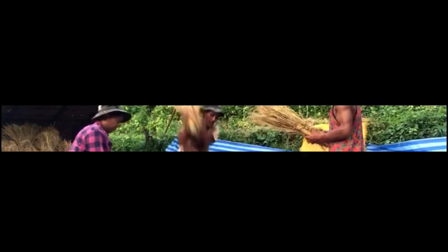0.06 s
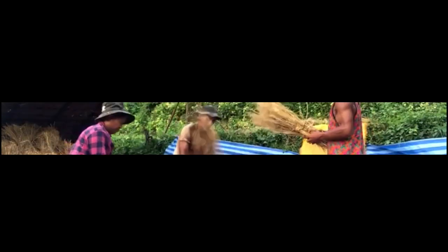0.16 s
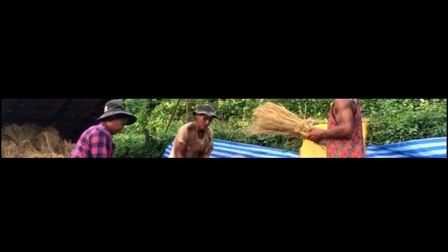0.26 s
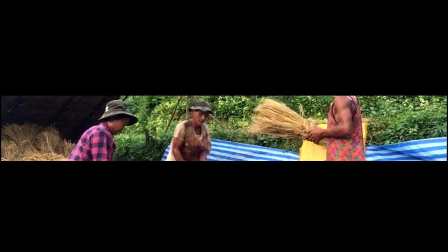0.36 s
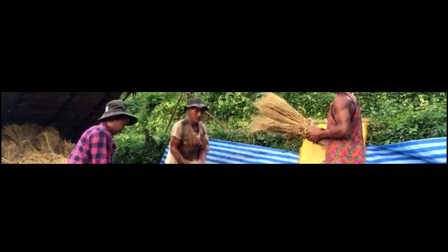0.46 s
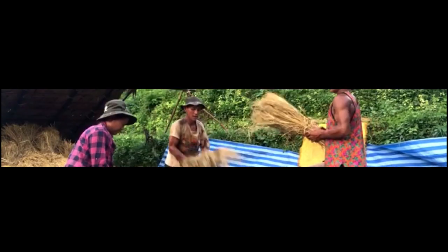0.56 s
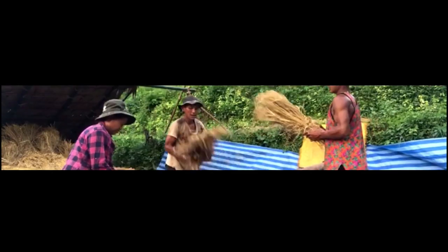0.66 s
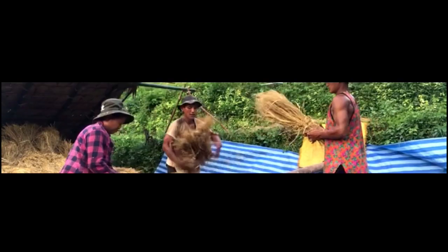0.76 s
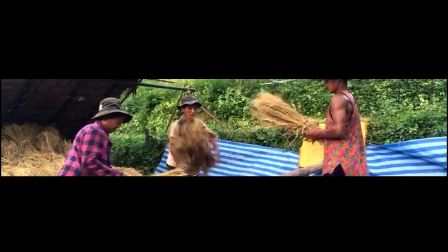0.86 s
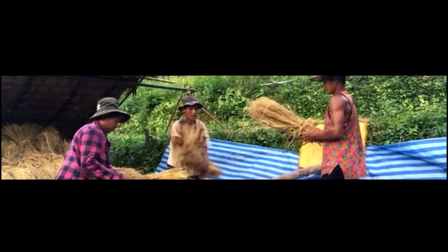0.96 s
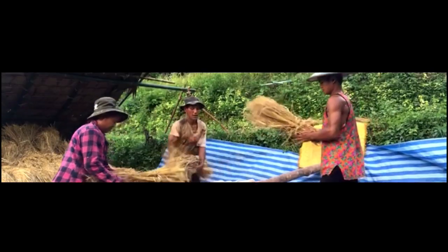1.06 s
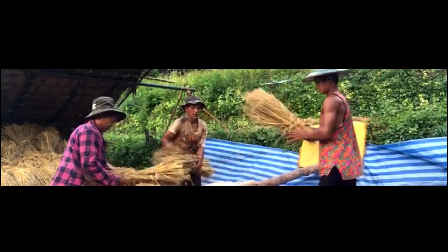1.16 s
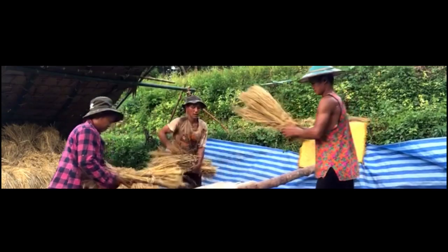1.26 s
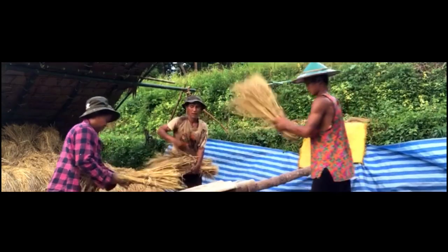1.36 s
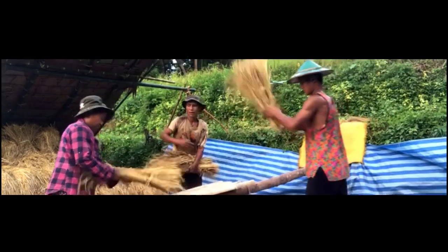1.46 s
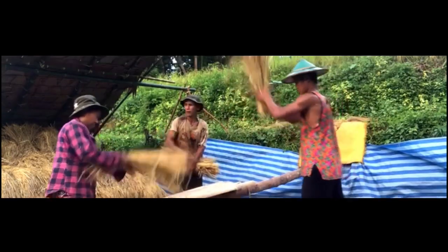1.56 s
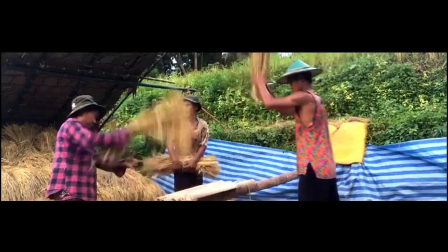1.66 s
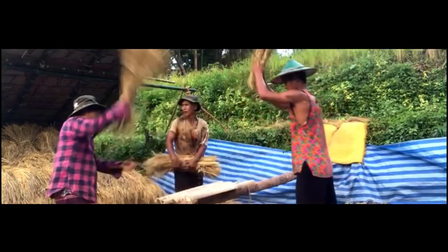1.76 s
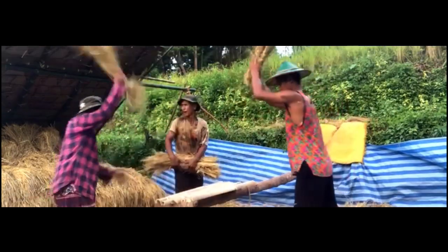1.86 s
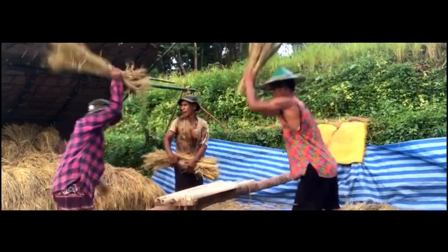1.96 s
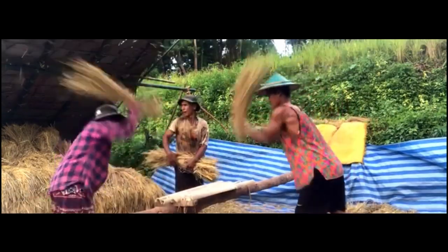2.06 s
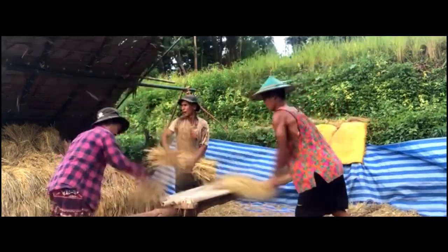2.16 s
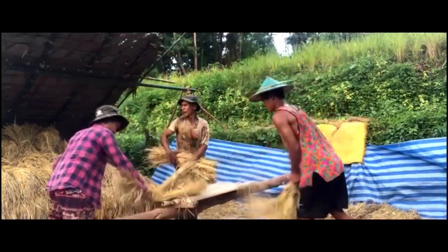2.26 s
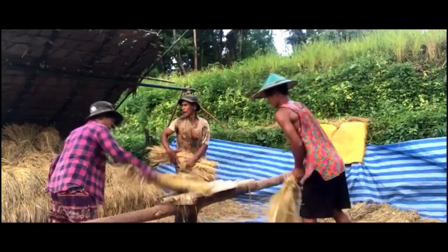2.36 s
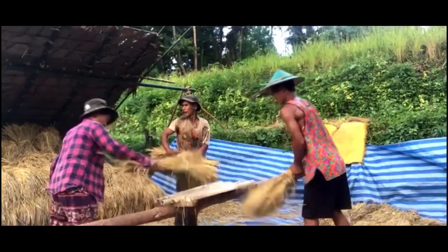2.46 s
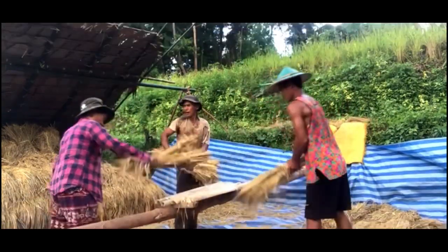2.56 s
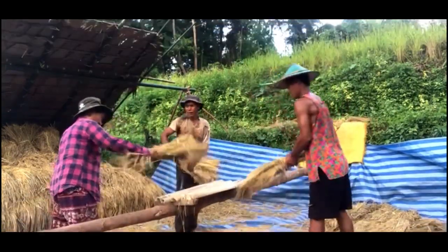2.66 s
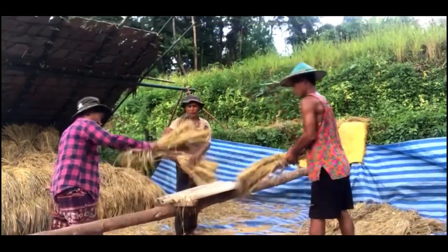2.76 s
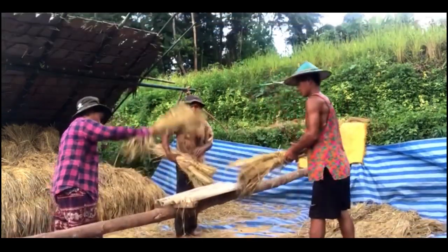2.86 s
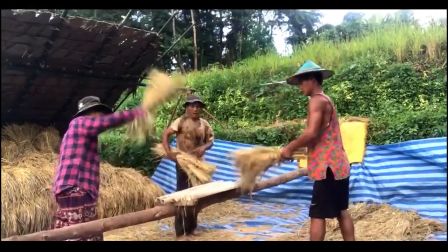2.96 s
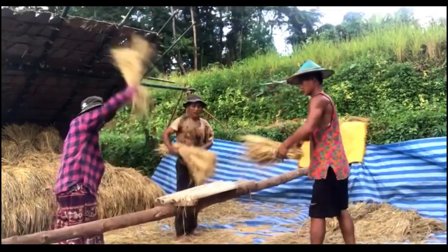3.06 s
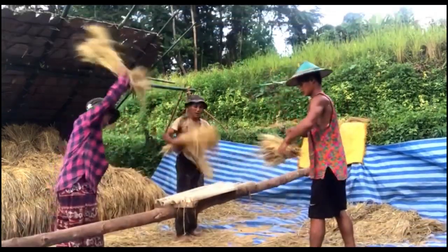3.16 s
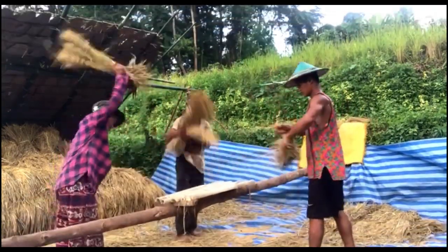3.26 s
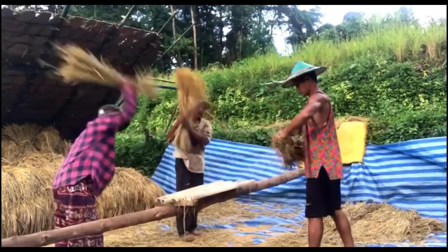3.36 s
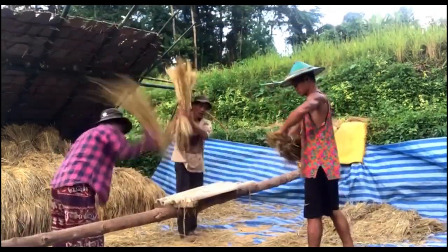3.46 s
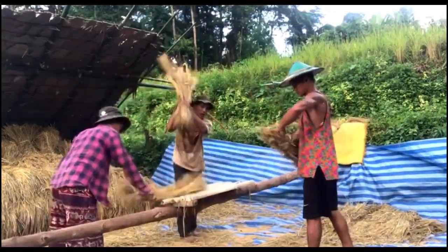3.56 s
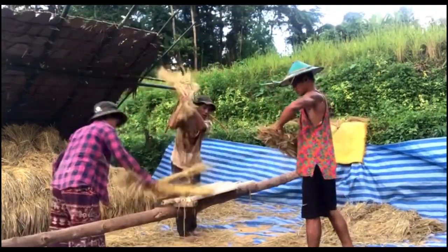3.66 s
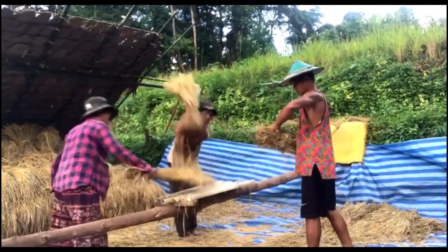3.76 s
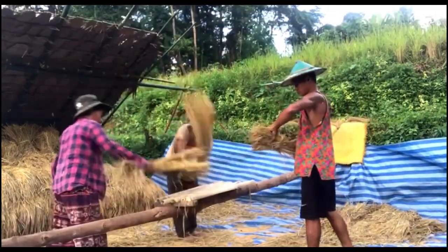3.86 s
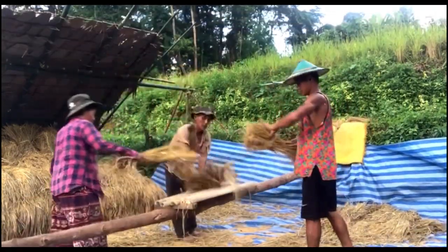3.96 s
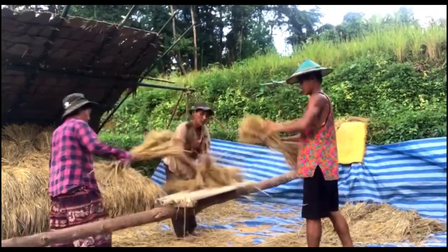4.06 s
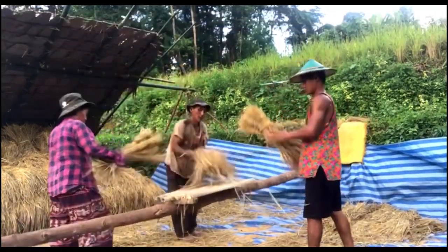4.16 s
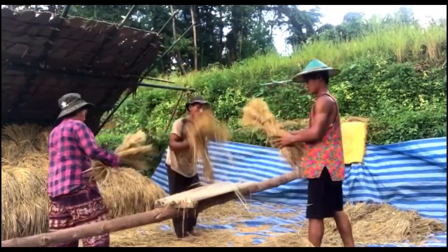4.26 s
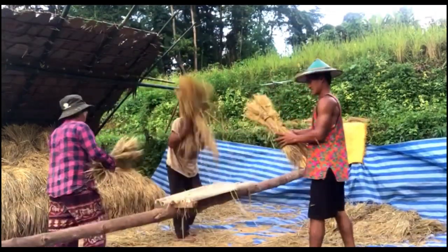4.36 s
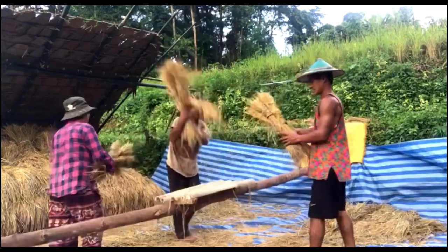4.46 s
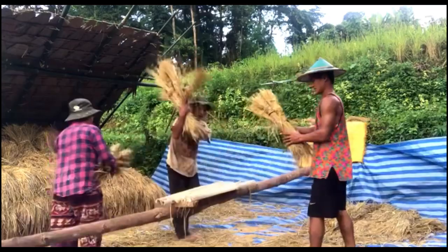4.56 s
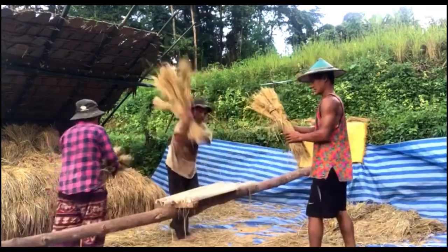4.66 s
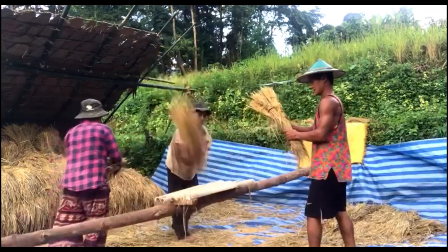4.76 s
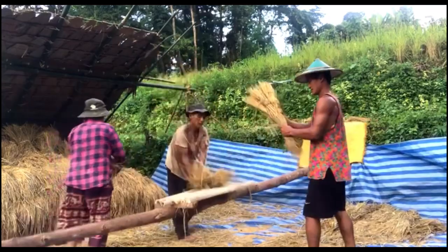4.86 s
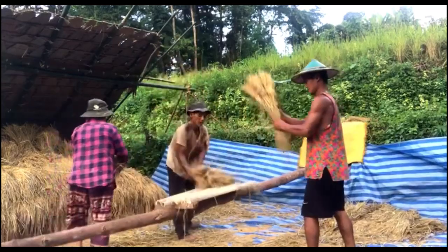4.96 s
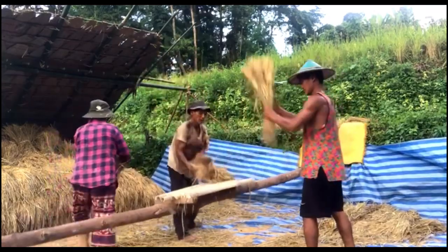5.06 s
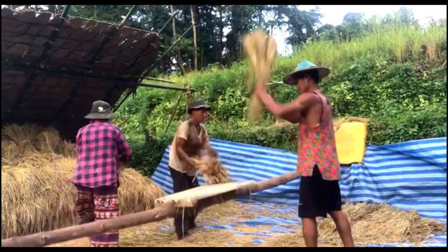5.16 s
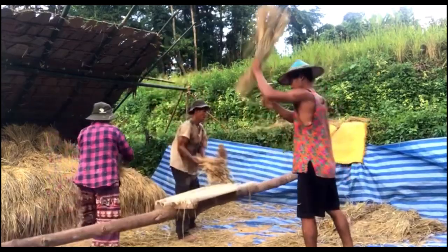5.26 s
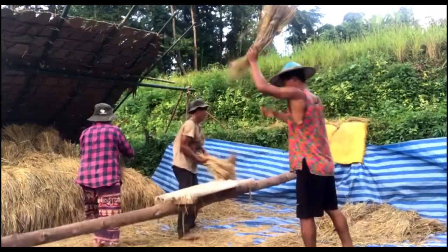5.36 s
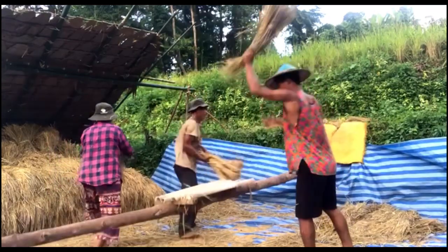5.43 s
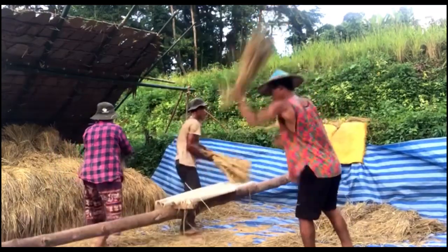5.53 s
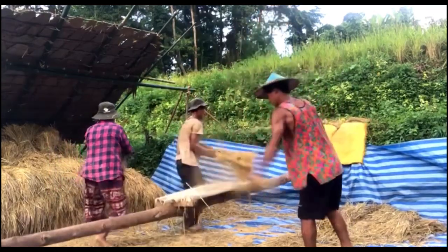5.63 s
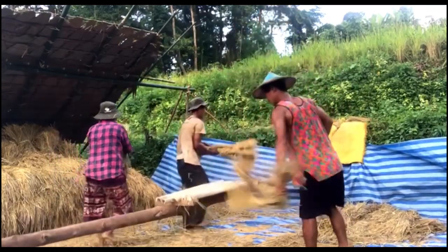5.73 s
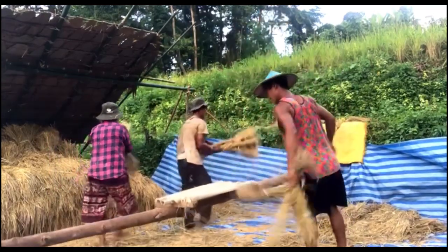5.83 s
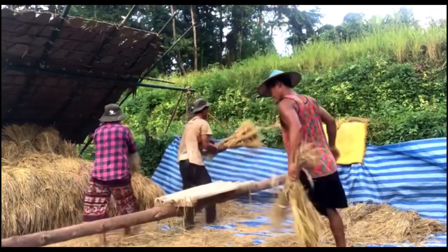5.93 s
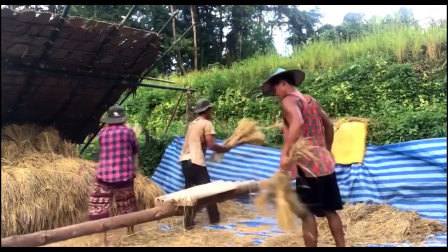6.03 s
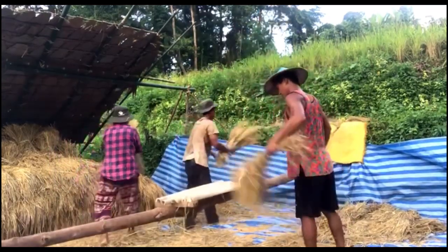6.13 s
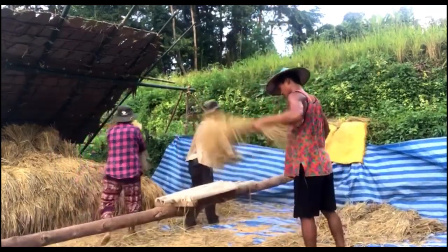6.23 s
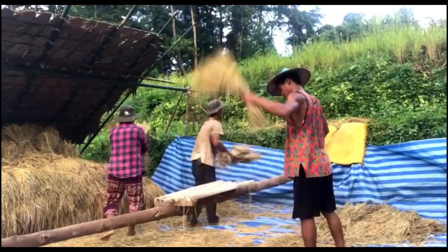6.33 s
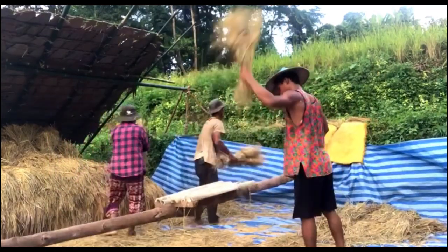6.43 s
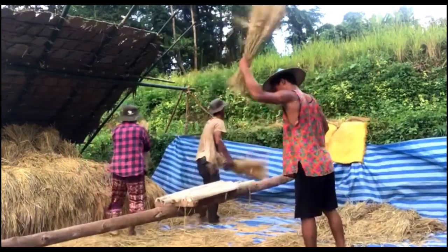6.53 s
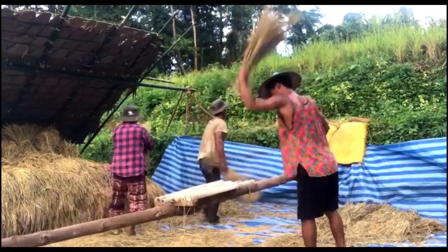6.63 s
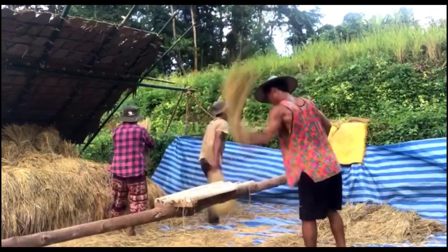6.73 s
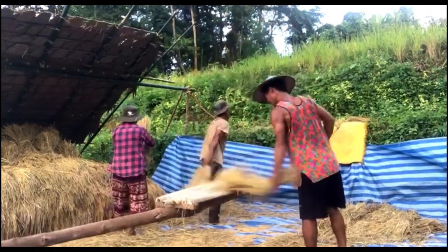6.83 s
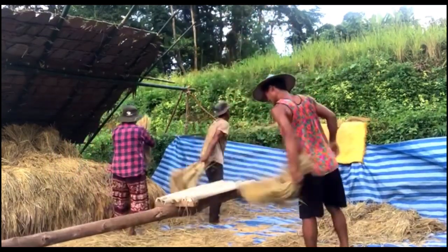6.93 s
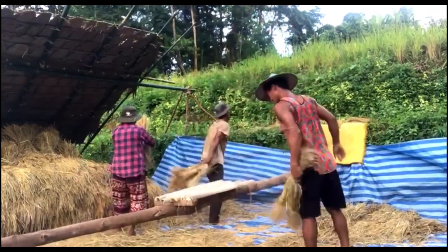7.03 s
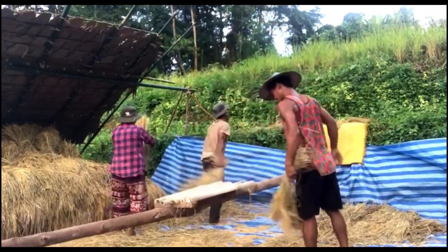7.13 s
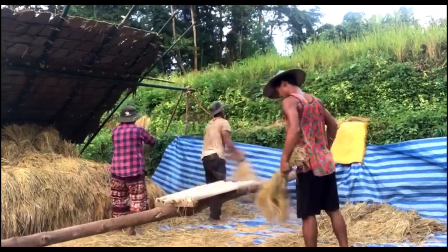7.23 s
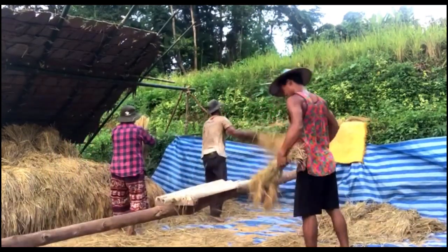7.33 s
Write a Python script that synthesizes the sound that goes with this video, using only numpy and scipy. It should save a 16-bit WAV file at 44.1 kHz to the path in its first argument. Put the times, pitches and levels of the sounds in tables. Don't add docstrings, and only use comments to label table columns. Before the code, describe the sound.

One woody blow comes at once, then straw is shaken and rustled for nearly two seconds before two quick smacks land almost together. More single blows follow irregularly, each with a swish before it, gritty grain spray and stalks dragging away. Dry stalks click and crackle between hits. Quiet open field air, barely audible high insects and a faint bird, picked up by a small mono microphone a few metres off.

```python
import sys
import numpy as np
from scipy import signal
from scipy.fft import rfft, irfft
from scipy.io import wavfile
from scipy.ndimage import uniform_filter1d

SR = 44100
rng = np.random.default_rng(int(sys.argv[2]) if len(sys.argv) > 2 else 0)


def digitize_waveform(pressure):
    field = np.atleast_2d(pressure).T
    bounded = np.clip(field, -1, 1)
    quanta = np.round(bounded * 32767).astype(np.int16)
    wavfile.write(sys.argv[1], SR, quanta)


def ratio_of_db(decibels):
    return 10 ** (np.asarray(decibels, float) / 20)


N = 325878

# time in seconds, peak level in dB, plank boom in Hz,
# boom level in dB and knock level in dB, both relative to the peak.
BLOW_EVENTS = [(0.2506, -7, 207, -9.5, -7), (2.2022, -1, 340, -32, -14.5), (2.2609, -5, 235, -10, -3.5),
               (3.6156, -2.5, 324, -16, -5.5), (3.9915, -3, 376, -13, -5.5), (4.8971, -3.5, 280, -19, -22),
               (5.7166, -4, 194, -10, -3.5), (6.8806, -3, 287, -16.5, -10)]


def unit(x):
    return x / np.sqrt(np.mean(x ** 2))


def top(x):
    return x / np.max(np.abs(x))


def colour(x, outline):
    hz, db = np.transpose(outline)
    bins_hz = np.maximum(np.arange(1025) * SR / 2048, 1)
    ceps = irfft(np.interp(np.log(bins_hz), np.log(hz), db) * np.log(10) / 20)
    ceps[1:1024] *= 2
    ceps[1025:] = 0
    response = irfft(np.exp(rfft(ceps)))
    return signal.fftconvolve(x, response)[:len(x)]


def band(x, lo_hz, hi_hz, order=2):
    edges_hz = [lo_hz, min(hi_hz, .45 * SR)]
    return signal.sosfilt(signal.butter(order, edges_hz, "band", fs=SR, output="sos"), x)


def split(x, hz):
    low = signal.sosfiltfilt(signal.butter(2, hz, fs=SR, output="sos"), x)
    return low, x - low


def ring(x, hz, t60):
    pole = np.exp(2j * np.pi * hz / SR - np.log(1000) / (t60 * SR))
    return signal.lfilter([1], [1, -pole], x).imag


def grains(size, spread_db):
    strength_db = spread_db * rng.exponential(size=size).clip(0, 4)
    return unit(rng.standard_normal(size) * ratio_of_db(strength_db))


def walk(rate):
    k = int(SR / rate)
    return unit(uniform_filter1d(uniform_filter1d(rng.standard_normal(N), k), k))


def add(out, s, x):
    i = int(s * SR)
    out[i:i + len(x)] += x[:len(out) - i]


def field():
    # frequency in Hz, level in dB per Hz.
    air_outline = [(15, -84), (35, -6), (60, 7.5), (140, -13.5), (400, -11), (1200, -6.5), (4500, 0.5),
                   (8000, -3), (12500, -10)]
    # frequency in Hz, half width in Hz, level in dB.
    insects = [(7740, 120, -1), (8050, 70, -6)]
    # start in seconds, length in seconds, level in dB.
    trills = [(0.92, 0.06, -57), (1.93, 0.12, -62), (2.84, 0.13, -60), (3.08, 0.43, -62), (4.37, 0.07, -62),
              (4.64, 0.06, -59), (5.2, 0.07, -64), (5.37, 0.22, -64), (6.71, 0.09, -61), (7.27, 0.11, -65)]
    # start in seconds, length in seconds, pitch in Hz, level in dB.
    bird_notes = [
        (2.642, 0.061, 3430, -62),
        (2.76, 0.33, 3130, -66),
        (2.83, 0.018, 1690, -59),
        (2.938, 0.071, 1660, -59),
        (3.153, 0.034, 1475, -65),
    ]
    t = np.arange(N) / SR
    out = unit(colour(rng.standard_normal(N), air_outline)) * ratio_of_db(-58)

    effort = ratio_of_db(-66.5)
    for s, length, db in trills:
        patch = np.exp(-((t - s - length / 2) / (.55 * length)) ** 4)
        effort = effort + ratio_of_db(db - 11) * patch
    flutter = 1 + .5 * np.sin(2 * np.pi * 150 * t)
    for hz, width_hz, db in insects:
        voice = unit(band(rng.standard_normal(N), hz - width_hz, hz + width_hz))
        out = out + voice * effort * flutter * ratio_of_db(db + 3.5 * walk(40))

    waver = ratio_of_db(3 * walk(90) - 2)
    drift = .012 * walk(60)
    for s, length, hz, db in bird_notes:
        u = t[:int(length * SR)]
        here = slice(int(s * SR), int(s * SR) + len(u))
        breath = np.sin(np.pi * np.sqrt(u / length)).clip(0)
        whistle = np.sin(2 * np.pi * hz * (u + np.cumsum(drift[here]) / SR))
        add(out, s, ratio_of_db(db + 8.5) * breath * whistle * waver[here])
    return out


def swell(s, db, rise, fall, shape=1.44):
    late = np.arange(N) / SR - s
    return ratio_of_db(db) * np.exp(-(1.55 * np.abs(late) / np.where(late < 0, rise, fall)) ** shape)


def motion():
    # time in seconds, leaf hiss in dB, swell in seconds,
    # fade in seconds, crunch in dB relative to the hiss.
    handling = [(.1, -49.5, 0.028, 0.35, -15), (.56, -49.5, 0.19, .1, -13), (.72, -46, 0.12, 0.11, -38),
                (.8, -51, 0.072, 0.26, -8.5), (1.01, -42, 0.037, 0.038, -20.5), (1.2, -50, 0.3, 0.12, -25),
                (1.57, -46.5, 0.12, 0.29, -19), (2.51, -46, 0.16, 0.24, -14), (2.85, -53, 0.28, 0.22, -15),
                (3.1, -56, 0.13, 0.051, -19), (3.71, -53.5, 0.049, 0.099, -10),
                (3.85, -44.5, 0.11, 0.098, -23), (4.16, -51, 0.055, 0.14, -11),
                (4.28, -49, 0.081, 0.12, -8), (4.47, -52.5, 0.078, 0.28, -2.5),
                (5.17, -55.5, 0.3, 0.21, -7.5), (6.17, -54.5, .1, .04, -3.5),
                (5.92, -46.5, 0.12, 0.2, -16.5), (6.04, -47.5, 0.17, 0.34, -14),
                (1.35, -50.5, 0.11, 0.14, -16), (6.3, -43.5, 0.052, 0.078, -19),
                (6.47, -53.5, 0.21, 0.22, -14), (6.67, -63, 0.073, 0.028, 4),
                (7.098, -43.5, 0.095, 0.17, -13.5)]
    # swing level in dB,
    # swing rise in seconds, drag level in dB.
    swings = [(-51.5, 0.19, -48), (-43, 0.061, -49), (-42, 0.048, -48.5), (-42, 0.063, -48.5),
              (-41, 0.047, -46.5), (-49.5, 0.14, -50.5), (-38.5, 0.061, -45), (-42.5, 0.054, -45.5)]
    leaves, crunch, feet, drags = ratio_of_db(-56.5), ratio_of_db(-64), ratio_of_db(-64.5), 0
    for s, db, rise, fall, crunch_db in handling:
        move = swell(s, db, rise, fall)
        leaves = leaves + move
        crunch = crunch + ratio_of_db(crunch_db) * move
        feet = feet + ratio_of_db(-30) * move
    for (s, *_), (swing_db, rise, drag_db) in zip(BLOW_EVENTS, swings):
        swing = swell(s - 0.01, swing_db, 2 * rise, 0.084, shape=2.05)
        leaves = leaves + swing
        crunch = crunch + ratio_of_db(-16) * swing
        drags = drags + swell(s + 0.1, drag_db, 0.12, 0.058)
    stems = leaves + drags
    return leaves + drags, stems, crunch + ratio_of_db(-10.5) * drags, feet + ratio_of_db(-7.5) * drags


def straw():
    # frequency in Hz, level in dB per Hz.
    rustle_outline = [(900, -20), (1800, -6), (3500, -2), (5000, -3), (6300, -1), (8500, -5), (11500, -8),
                      (13000, -12)]
    leaves, stems, coarse, feet = motion()
    rubbing = colour(grains(N, 2.5), rustle_outline) * ratio_of_db(1.1 * walk(30))
    rustle, hiss = split(rubbing, 5200)
    crunch = unit(band(grains(N, 5.7), 550, 1760)) * coarse * ratio_of_db(2 * walk(34))
    shuffle = unit(band(rng.standard_normal(N), 27, 383)) * feet * ratio_of_db(1.8 * walk(23))
    return leaves * unit(hiss) * ratio_of_db(-5) + stems * unit(rustle) * ratio_of_db(-7.5) + crunch + shuffle


def snap(body_db, body_hz, crack_db, tick_db, after_db):
    t = np.arange(SR // 20) / SR
    slips = ratio_of_db(after_db) * grains(len(t), 1.7) * np.exp(-t / 0.01) * (t > .002)
    when, size = rng.random(4), rng.uniform(-0.25, 0.5, 4)
    slips[(when * .003 * SR).astype(int)] += size
    slips[int(.0016 * SR)] += 1
    body = top(ring(band(slips, body_hz / 1.7, body_hz * 1.7), body_hz, .0055))
    crack, tick = split(band(slips, 1700, 9500), 4500)
    crack_hz = 2900 * (1 + 0.79 * size[0])
    crack = top(crack) + 0.2 * top(ring(crack, crack_hz, 0.0076))
    return ratio_of_db(body_db) * body + ratio_of_db(crack_db) * top(crack) + ratio_of_db(tick_db) * top(tick)


def stalks():
    # time in seconds, ring level in dB, ring in Hz, crack in dB, tick in dB.
    thick = [(0.3749, -22, 1910, -28, -41), (0.459, -29.5, 1530, -31.5, -38),
             (0.5596, -30.5, 1590, -33, -41), (0.5992, -30.5, 1050, -32, -33),
             (0.8003, -54, 1960, -29.5, -45), (4.1359, -28, 1120, -23, -37),
             (4.1622, -25.5, 1780, -23, -50), (4.198, -33.5, 1140, -29, -40.5),
             (4.2487, -25, 2060, -22, -26), (4.277, -22.5, 1180, -21.5, -25),
             (4.3467, -35.5, 1450, -26.5, -36), (4.372, -33, 1240, -29.5, -38),
             (4.473, -26, 1190, -18, -32), (4.5185, -30, 1470, -31, -51), (4.5212, -29.5, 1840, -29, -46),
             (4.613, -35.5, 1010, -41, -36), (5.233, -35.5, 2130, -48, -53), (5.5006, -32, 970, -31.5, -52),
             (6.65, -29.5, 1390, -30, -39), (6.6938, -36, 1020, -30.5, -24.5),
             (6.8669, -22, 1250, -27, -28), (7.0905, -31, 1590, -25, -29), (7.2388, -30, 1550, -34.5, -46),
             (7.3078, -38, 1870, -25, -39)]
    # time in seconds, crack in dB, tick in dB, faint ring in dB.
    thin = [(0.772, -36, -29, -42), (0.8988, -35.5, -55, -61), (2.5566, -26, -39, -36),
            (4.075, -30, -48, -36), (0.0268, -54, -51, -36), (0.8293, -34.5, -42, -35.5),
            (1.064, -57, -54, -41.5), (4.603, -33, -48, -44), (4.629, -30.5, -47, -59),
            (4.6954, -45, -49, -38), (5.05, -34, -44, -48), (5.0748, -40, -32, -42),
            (5.1773, -28.5, -31, -54), (5.33, -36.5, -51, -59), (5.3883, -37, -48, -59),
            (5.4706, -34, -46, -39), (6.23, -39, -36, -52), (6.2563, -33, -35.5, -60),
            (2.599, -42, -53, -38), (4.5066, -43, -45, -39), (6.4146, -34, -36, -38.5),
            (6.5086, -38, -33, -41), (6.5755, -40, -36, -40.5), (6.666, -33, -41, -45),
            (4.5774, -36, -39, -37), (6.776, -32, -49, -37), (6.7895, -26, -41, -38.5),
            (6.8298, -30, -44, -44), (6.9874, -31, -54, -58), (4.5526, -35, -42, -41)]
    tear_s, tear_gap_s, tear_count, tear_db, tear_hz = 4.4513, .0022, 6, -33, 1150
    rows = list(thick)
    for s, crack_db, tick_db, ring_db in thin:
        rows.append((s, ring_db, 1450, crack_db, tick_db))
    for k, (a, b, c) in enumerate(rng.uniform(-1, 1, (tear_count, 3))):
        s, hz = tear_s + k * tear_gap_s, tear_hz * (1 + .15 * b)
        rows.append((s, tear_db + 2 * a, hz, tear_db + 4 + 2 * c, tear_db - 12))
    out = np.zeros(N)
    for s, *tone in rows:
        add(out, s - .0018, snap(*tone, after_db=-28.5))
    return out


def blow(boom_hz, boom_db, knock_db, bright_db, rise, spread, lag, knock_hz, loose_db, shake_db, spot):
    # frequency in Hz, level in dB per Hz.
    spray_outline = [(500, -14.5), (1100, -11), (2200, -5.5), (4000, -4.5), (5000, -6.5), (6300, 0),
                     (8000, -4), (11500, -3.5), (13000, -8.5)]
    # frequency in Hz, level in dB, 60 dB decay in seconds.
    plank_modes = [(444, -17, 0.059), (727, -19, 0.043), (875, 7, 0.075), (1040, -11.5, 0.085),
                   (1232, -2.5, 0.079), (1560, 15, 0.018), (1640, 19, 0.028)]
    t = np.arange(SR // 2) / SR
    contact = (1 - np.exp(-(t / rise) ** 2)) / (1 + np.exp((t - spread) / .002))
    patter = ratio_of_db(loose_db + 29.5) * np.exp(-t / 0.013) * (1 - np.exp(-t / 0.0018))
    kernels = colour(grains(len(t), 3.0) * (contact + patter), spray_outline)
    dull, bright = split(kernels, 4980)
    struck = (dull + bright) * contact ** 2
    wood = sum(ratio_of_db(db) * top(ring(struck, hz, .013)) for hz, db in np.reshape(spot, (2, 2)))
    spray = top(top(dull) + wood) + ratio_of_db(bright_db - 4.0) * top(bright)

    clumps = ratio_of_db(4.5 * walk(250)[:len(t)])
    trickle = unit(band(grains(len(t), 6.0) * clumps, 640, 2800, order=1))
    trickle = trickle * np.exp(-t / 0.021) * (1 - np.exp(-t / 0.0035))

    weight = np.exp(-((t - lag) / 0.0051) ** 2) + ratio_of_db(-4) * np.exp(-t / 0.016) * (t > lag)
    rough = band(rng.standard_normal(len(t)), knock_hz / 1.94, knock_hz * 1.49) * weight
    detune = 1 + 0.0513 * rng.standard_normal(len(plank_modes))
    modes = sum(ratio_of_db(db) * ring(rough, hz * d, t60) for (hz, db, t60), d in zip(plank_modes, detune))
    knock = top(top(rough) + 0.43 * top(modes))
    push = np.exp(-((t - lag + 0.0023) * boom_hz / 0.078) ** 2)
    thud = band(rng.standard_normal(len(t)) * weight, 126, 414)
    boom = top(band(ring(push, boom_hz, 0.052), boom_hz / 2, 960)) + 0.94 * top(thud)

    sway = (1 - np.exp(-t / 0.0011)) * (np.exp(-t / 0.022) + 0.023 * np.exp(-t / 0.3))
    shake = unit(band(rng.standard_normal(len(t)), 42, 145)) * sway
    low = band(ratio_of_db(boom_db) * boom + ratio_of_db(shake_db + 7) * shake, 33, 900, order=3)
    return spray + ratio_of_db(loose_db - 3.0) * trickle + ratio_of_db(knock_db + 1.5) * knock + low


def flop(bright_db, thud_db, fade):
    t = np.arange(SR // 6) / SR
    crunch = grains(len(t), 4.0) * (1 - np.exp(-t / .001)) * np.exp(-t / fade)
    dull, bright = split(band(crunch, 430, 8400, order=1), 4000)
    return top(dull) + ratio_of_db(bright_db) * top(bright) + ratio_of_db(thud_db) * top(band(crunch, 110, 630))


def scene():
    # rise in seconds, spread of the contact in seconds,
    # lag of the stalks in seconds, knock in Hz.
    landings = [(0.0095, 0.014, .011, 1500), (0.0034, 0.012, 0.0089, 1100), (0.002, 0.013, 0.0093, 1070),
                (0.0025, 0.0099, 0.0065, 880), (0.0023, 0.013, 0.01142, 570), (0.0026, 0.01, 0.00764, 2900),
                (0.0043, 0.019, 0.00776, 890), (0.00047, 0.0057, 0.00525, 670)]
    # spray brightness in dB, loose kernels in dB, pole shake in dB,
    # relative to the peak.
    shedding = [(2, -24, -25), (0.5, -25.5, -30.5), (4, -16, -38), (-1, -17.5, -32.5), (-0.5, -17, -31.5),
                (-1, -18.5, -36), (-1.5, -5, -29.5), (-0.5, -18.5, -30)]
    # first in Hz, its level in dB,
    # second in Hz, its level in dB.
    spots = [(1530, -18, 1900, -9), (762, -8, 2000, -20), (1260, -9, 6550, -13), (1470, -19, 2700, -37),
             (1530, -9, 4300, -10.5), (1685, -5.5, 6200, -26), (790, -8.5, 8200, -19), (1800, -9, 3350, -7)]
    # time in seconds, peak in dB,
    # brightness in dB, thud in dB, fade in seconds.
    flops = [(0.274, -14.5, -1, -7, 0.0045), (0.297, -26, -6, -15, 0.0061), (0.977, -38.5, 6, -27, 0.011),
             (2.495, -36, -8, -30, 0.038), (3.645, -28, -19, -2, 0.012), (5.844, -35.5, 7, -23, 0.0046),
             (5.883, -42, 12, -25, .003), (4.037, -36, 8, -12, 0.0059), (4.944, -31, 3, -10, 0.029),
             (5.758, -31, -21, 2, 0.0089), (5.771, -24, -33, -12, 0.024), (6.275, -28.5, 0, -13, 0.017),
             (6.329, -32, -17, -32, 0.0052), (6.896, -6, -21, -17, 0.0055), (6.917, -20, -7, -20, 0.01),
             (6.941, -22, -30, -38, 0.016), (7.089, -34, 5, -37, 0.0085)]
    out = straw() + field()
    for event, landing, shed, spot in zip(BLOW_EVENTS, landings, shedding, spots):
        s, db, *tone = event
        bright_db, *loose = shed
        add(out, s - .003, ratio_of_db(db + 0.5) * blow(*tone, bright_db, *landing, *loose, spot))
    for s, db, *tone in flops:
        add(out, s - .001, ratio_of_db(db) * flop(*tone))
    return (out + stalks())[None]


def band_limit(x):
    return signal.sosfilt(signal.butter(12, 12680, fs=SR, output="sos"), x)


def record(dry):
    rounded = dry / (1 + np.abs(dry / 1.05) ** 8) ** (1 / 8)
    x = signal.sosfilt(signal.butter(3, 44, "high", fs=SR, output="sos"), rounded)
    x = signal.sosfilt(signal.ellip(9, .3, 55, 11850, fs=SR, output="sos"), x)
    return band_limit(np.clip(x, -1, 1))


dry = scene()
out = record(dry)
digitize_waveform(out)
```